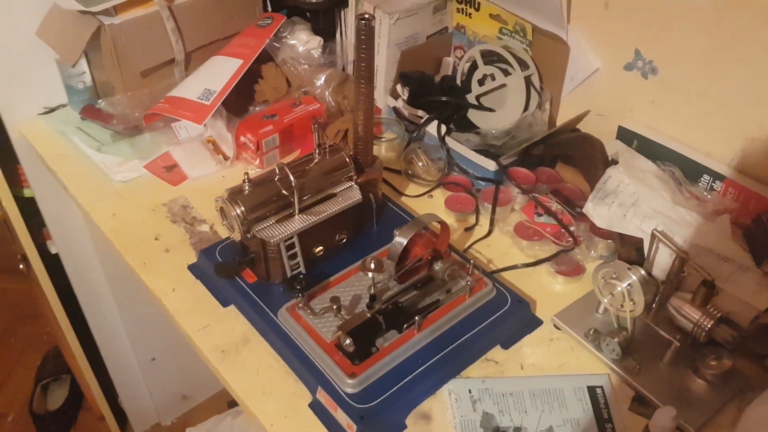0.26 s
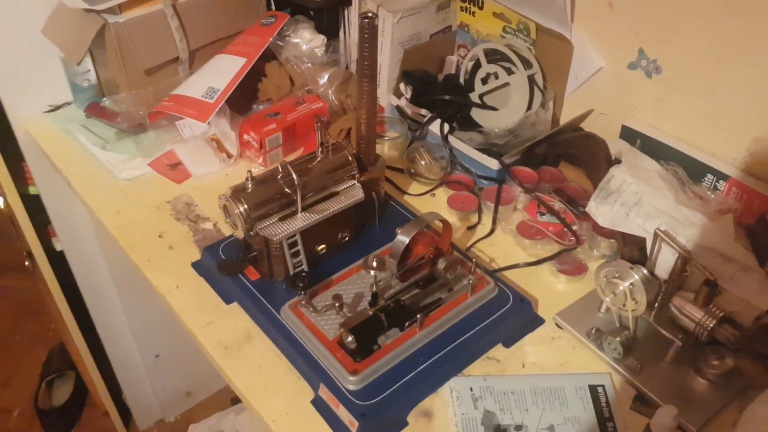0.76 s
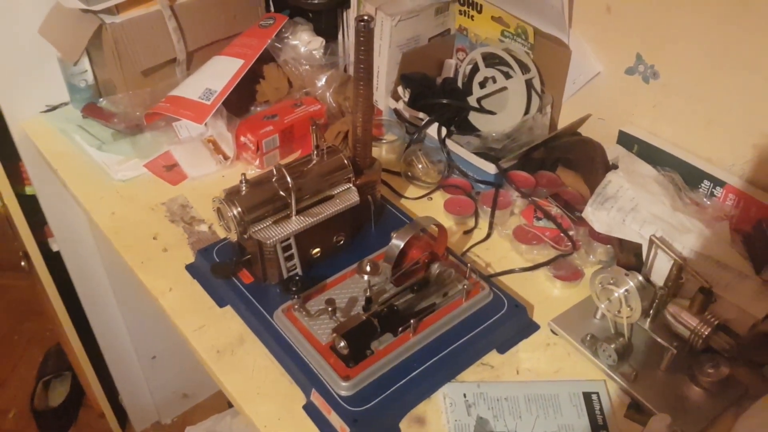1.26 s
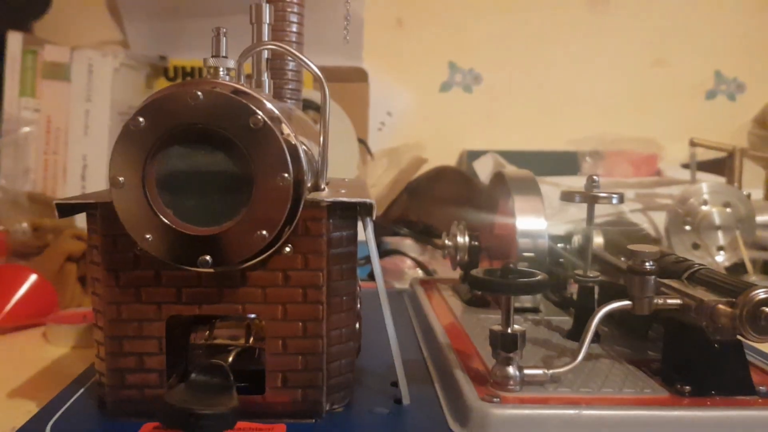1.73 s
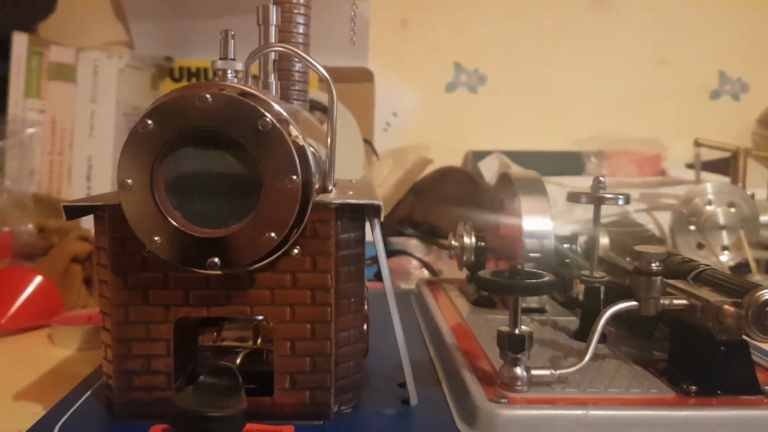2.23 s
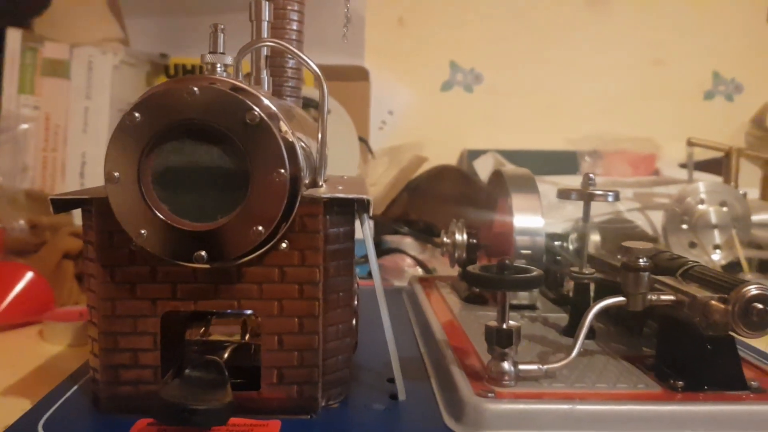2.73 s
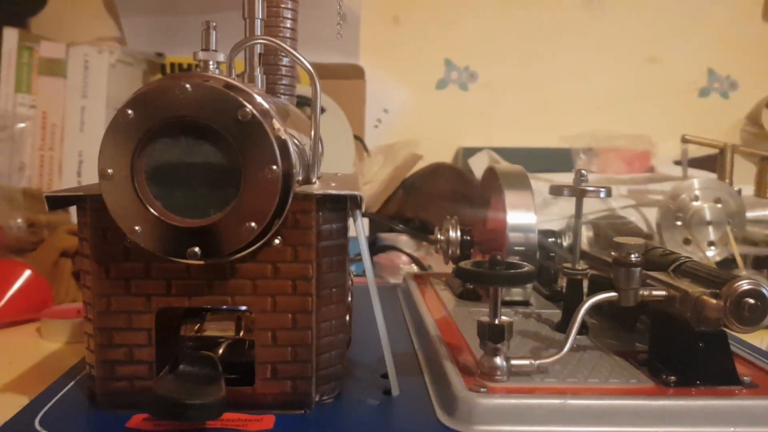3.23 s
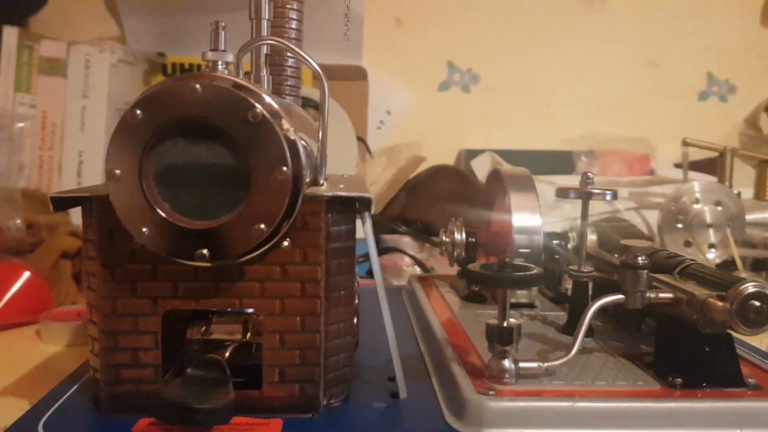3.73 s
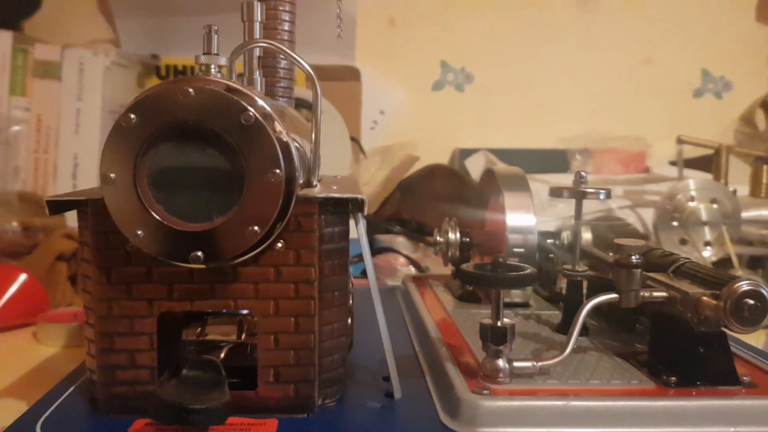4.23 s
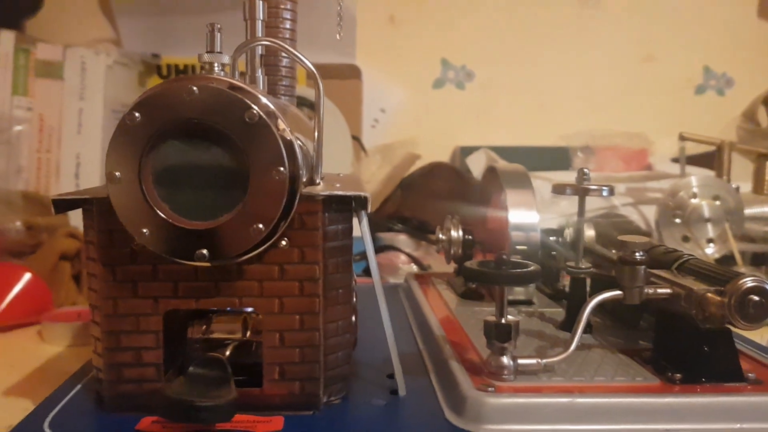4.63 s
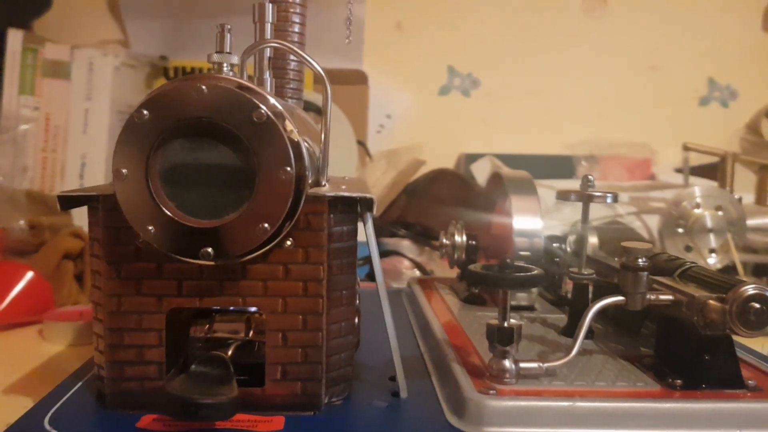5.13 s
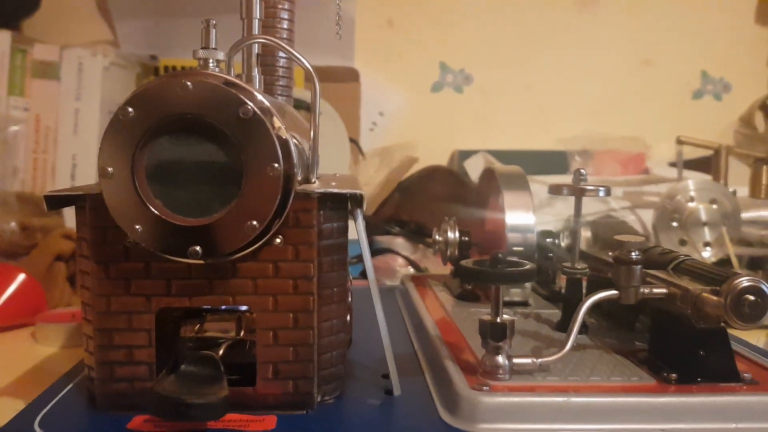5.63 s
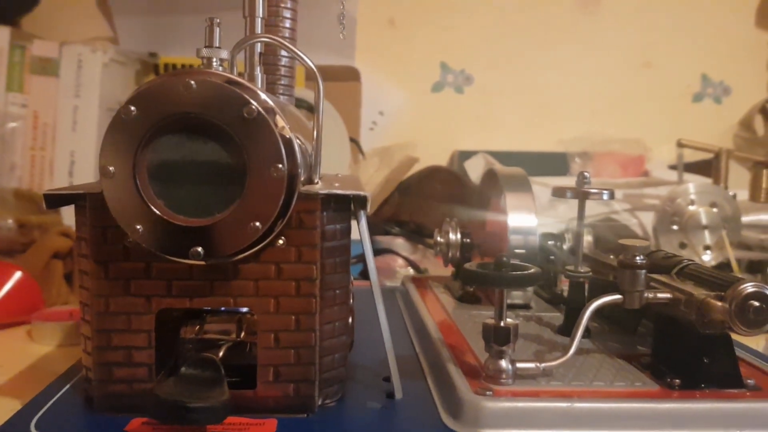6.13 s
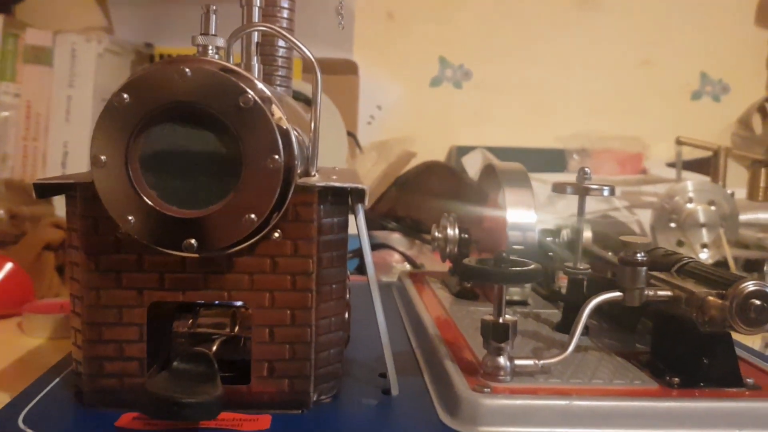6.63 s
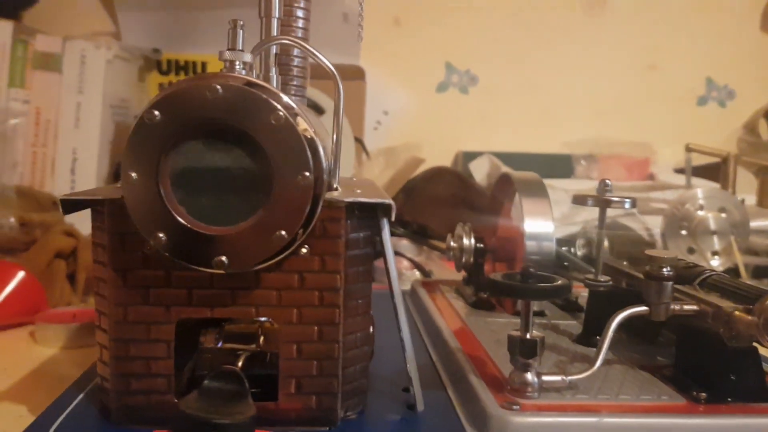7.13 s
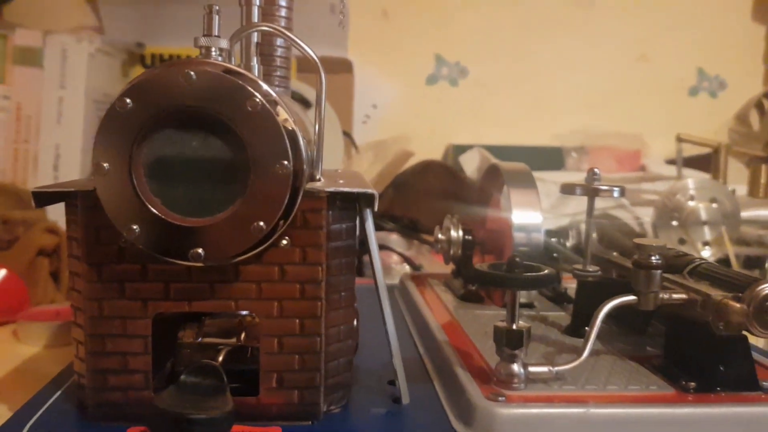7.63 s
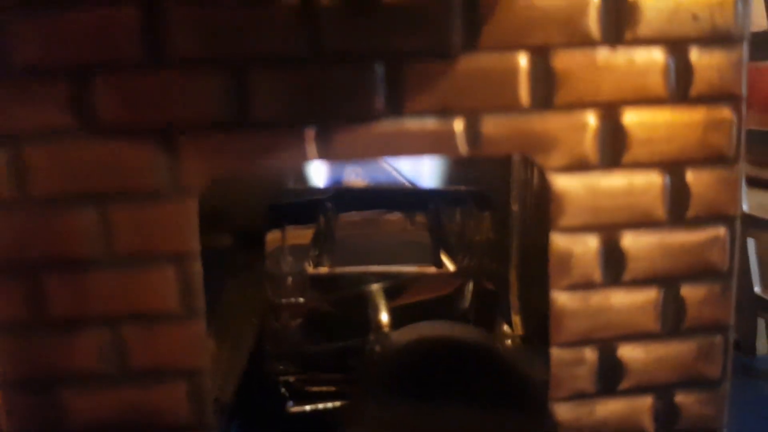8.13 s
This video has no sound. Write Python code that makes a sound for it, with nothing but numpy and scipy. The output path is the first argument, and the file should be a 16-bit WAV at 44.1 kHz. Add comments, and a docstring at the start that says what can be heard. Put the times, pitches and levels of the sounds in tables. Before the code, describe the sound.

A small model steam engine buzzes, clatters and hisses steadily indoors, duller at a second position with hand bumps, then suddenly close and loud.

```python
"""A model steam engine hums, clatters and hisses throughout, on a tin base shaken about 32 times a second indoors.
The hum sums multiples of the crank speed, loose joints strike the tin's resonances, and noise shaped by the
turning crank makes the steam hiss. Two close low tones beat about three times a second. Three listening places
follow in turn; in the second a hand shades the left microphone port; rubs and bumps run on into the third,
and the hardest bump makes the gain control turn everything down."""
import sys
import numpy as np
from scipy import signal
from scipy.fft import rfft, irfft, next_fast_len
from scipy.io import wavfile
from scipy.ndimage import uniform_filter1d, minimum_filter1d, map_coordinates

SR = 44100
rng = np.random.default_rng(int(sys.argv[2]) if len(sys.argv) > 2 else 0)


def wrap_up_sound(samples):
    """Save the sound to the file named by the first command line argument, as 16-bit audio."""
    columns = np.atleast_2d(samples).T
    # keep every value between -1 and 1, then stretch to whole-number steps
    tamed = np.clip(columns, -1, 1)
    steps = np.round(tamed * 32767).astype(np.int16)
    wavfile.write(sys.argv[1], SR, steps)


N = 368667

# Listening places. Each row: start in seconds, end in seconds, crank angle at the start in turns,
# lag of the left ear in milliseconds.
LISTENING_PLACES = [(0, 1.455, .775, -.36), (1.455, 7.818, .285, -.2), (7.818, 8.36, .7, .25)]


def amp(db):
    """Level law: decibels become an amplitude ratio."""
    return 10 ** (np.asarray(db) / 20)


def unit(x):
    """Normalisation: the signal is scaled to rms 1."""
    return x / np.sqrt(np.mean(x ** 2) + 1e-20)


def along(points, hz):
    """Logarithmic pitch: (Hz, value) points are interpolated on a log-frequency axis."""
    f, v = np.transpose(points)
    return np.interp(np.log(hz + 1), np.log(f + 1), v)


def curves(rows, t):
    """Linear interpolation: each column after the time is read at the times t."""
    s, *cols = np.transpose(rows)
    return [np.interp(t, s, c) for c in cols]


def wobble(t, rate):
    """Slow random modulation: a spline through random knots, rate knots a second."""
    at = (t - t[0]) * rate
    knots = rng.standard_normal(int(at[-1]) + 4)
    return map_coordinates(knots, [at + 1])


def coloured(x, gain):
    """Minimum-phase filtering: a folded cepstrum gives the causal filter of magnitude gain(Hz)."""
    n = x.shape[-1]
    m = 2 * next_fast_len(n // 2 + 4096)
    magnitude = np.maximum(gain(np.fft.rfftfreq(m, 1 / SR)), 1e-6)
    cepstrum = irfft(np.log(magnitude))
    cepstrum[1:m // 2] *= 2
    cepstrum[m // 2 + 1:] = 0
    response = np.exp(rfft(cepstrum))
    return irfft(rfft(x, m) * response, m)[..., :n]


def ears(pair, place):
    """Interaural coherence: two signals become partly alike ears, whose average has rms 1."""
    # Level difference at each place. Each row: frequency in Hz, left minus right in dB.
    ear_tilt = [
        [(60, 0), (110, 5.5), (200, 6), (380, 5.5), (700, 15.5), (1290, 18.5), (2380, 24), (4400, 17.5),
         (8120, 31), (15000, 22)],
        [(60, 8), (110, 3), (200, 12.5), (380, 10), (700, 12), (1290, 18), (2380, 15), (4400, 6.5), (8120, 4),
         (15000, 15)],
        [(60, 5), (110, 4.5), (200, 19), (380, 8), (700, 13.5), (1290, 19.5), (2380, 14), (4400, 7.5),
         (8120, 7.5), (15000, 7)],
    ]
    # Likeness of the ears. Each row: frequency in Hz, coherence from 0 to 1.
    likeness = [(100, .95), (300, .96), (600, .8), (2000, .74), (4000, .3), (12000, .2)]
    n = pair.shape[-1]
    m = next_fast_len(n + 512)
    hz = np.fft.rfftfreq(m, 1 / SR)
    left, other = rfft(pair, m)
    alike = np.clip(along(likeness, hz), 0, 1)
    lag_s = LISTENING_PLACES[place][3] / 1000
    advance = np.exp(2j * np.pi * hz * lag_s)
    mixed = alike * left + np.sqrt(1 - alike ** 2) * other
    right = mixed * amp(-along(ear_tilt[place], hz)) * advance
    both = irfft(np.array([left, right]), m)[:, :n]
    return both / np.sqrt(np.mean(both.mean(axis=0) ** 2))


def engine(t, place):
    """Common periodicity: one crank, its angle the integral of its speed, times every part."""
    # Crank speed at each place. Each row: time in seconds, speed in turns a second.
    crank_speed = [
        [(0, 31.05), (0.7, 31.31), (1.455, 31.56)],
        [(1.455, 32.16), (2.3, 32.37), (3.2, 32.46), (4.2, 32.48), (5, 32.53), (5.8, 32.5), (6.6, 32.71),
         (7.818, 32.6)],
        [(7.818, 32.14), (8.36, 32.2)],
    ]
    # Spectrum of the steam's puff. Each row: frequency in Hz, relative level in dB.
    puff_colour = [(1500, -16), (3400, 0), (4200, -1.5), (4850, -0.5), (5500, -5.5), (6300, -7.5),
                   (7200, -25), (9000, -46), (16000, -77)]
    # Spectrum of the finer sizzle at each place. Each row: frequency in Hz, relative level in dB.
    sizzle_colour = [
        [(3000, -20), (6000, -12), (7000, -10.5), (8500, -14.5), (10200, -6), (12200, 1.5), (14200, -1.5),
         (16000, -8.5)],
        [(6000, -50), (8400, -25), (10000, -9), (11500, -2), (13500, 1), (15200, 3), (16000, -8)],
        [(6000, -32), (8400, -18.5), (10200, -8), (13200, -3.5), (15200, 1), (16000, -6)],
    ]
    start, _, angle, _ = LISTENING_PLACES[place]
    turned = np.cumsum(curves(crank_speed[place], t)[0]) / SR
    crank = angle + turned - np.interp(start, t, turned)
    hum_gain, clatter_gain, puff_gain, sizzle_gain = levels(t, place)
    base = hum(t, crank, place, kick_angle=.55, spread=0.67, stray_db=-6.0, swing_db=4)
    knocks = clatter(t, crank, place, t60=0.045, scatter_db=2, jitter_s=.00004,
                     loose_db=1.0, broad_db=-5.5, ring_db=-0.5)
    puff = steam(t, crank, place, puff_colour, depth=0.76, flutter_db=1.0, spit_db=-0.5)
    sizzle = steam(t, crank, place, sizzle_colour[place], depth=0.9, flutter_db=1.5, spit_db=1.5)
    return (throb(t, crank, place, partner_db=1.0, depth_db=3, shudder_db=-6)
            + hum_gain * base + clatter_gain * knocks + puff_gain * puff + sizzle_gain * sizzle)


def hum(t, crank, place, kick_angle, spread, stray_db, swing_db):
    """Harmonic series: a kick once a turn drives whole multiples of the speed, partly in step."""
    # Hum of the base at each place. Each row: multiple of the crank speed, relative level in dB.
    harmonics = [
        [(2, -17.5), (3, -6.5), (5, -10.5), (6, -10.5), (7, 1), (8, -32), (9, -6), (10, -5), (11, -9),
         (12, -23.5), (15, -1.5), (16, -33), (26, -10), (34, -11.5)],
        [(2, -12), (3, -5.5), (5, -28), (6, -5), (7, -8.5), (8, -6.5), (9, 2), (10, -8), (11, -12.5),
         (12, -15.5), (13, -19), (14, -7), (15, 0), (16, -5.5), (17, -12), (18, -16), (33, -11.5), (34, -18.5),
         (39, -20.5)],
        [(2, -18), (3, -5), (6, -28), (7, -23), (8, -16), (9, -1), (10, -14.5), (11, -9), (12, -8), (14, -1.5),
         (15, .5), (16, -3.5), (17, -23.5), (18, -15), (21, -13)],
    ]
    # Irregular shaking of base and table. Each row: frequency in Hz, relative level in dB.
    shake_colour = [(20, -53), (40, -1), (65, -15), (105, 3), (138, 9), (170, -4.5), (215, 6), (290, 6),
                    (390, -10), (490, 8), (580, -3.5), (900, -51.5)]
    lines = np.zeros(len(t))
    for k, db in harmonics[place]:
        cycles = round(k) * (crank - kick_angle) + spread * rng.random()
        lines += amp(db + .9 * wobble(t, 14)) * np.sin(2 * np.pi * cycles)
    # the loose shaking is strongest a quarter turn before the kick angle
    kick = amp(swing_db * np.sin(2 * np.pi * (kick_angle - crank)))
    noise = kick * rng.standard_normal((2, len(t)))
    shake = coloured(noise, lambda hz: amp(along(shake_colour, hz)))
    return ears(np.array([lines, 0 * t]), place) + amp(stray_db) * ears(shake, place)


def clatter(t, crank, place, t60, scatter_db, jitter_s, loose_db, broad_db, ring_db):
    """Impact excitation: each joint strikes once a turn, a little unevenly, and rings the tin's modes."""
    # Knocks within a turn. Each row: crank angle in turns, mean relative level in dB.
    joints = [(.04, -6), (.125, -2.5), (.22, -4.5), (.305, -1.5), (.385, -3), (.46, -7.5), (.535, -4),
              (.655, -4), (.8, -5.5)]
    # Tin resonances at each place. Each row: centre in Hz, nominal width in Hz, relative level in dB.
    tin_modes = [
        [(796, 37, -9), (1165, 25, -6), (1580, 31, -17), (2230, 51, 2), (2730, 114, -2.5), (3078, 55, -5.5),
         (4660, 70, -15)],
        [(751, 115, -3.5), (1099, 60, -1), (1609, 19.7, -3), (1936, 42, 1.5), (2224, 120, -7), (2700, 69, -6.5),
         (3096, 39, -16.5), (3335, 18, -15)],
        [(668, 52, -9), (1150, 300, -5), (1390, 54, -2.5), (2260, 96, -1), (2720, 73, -5), (3630, 42, -20),
         (4310, 73, -17)],
    ]
    # Broad spectrum of the knocks at each place. Each row: frequency in Hz, relative level in dB.
    knock_colour = [
        [(330, -52), (560, -27), (632, 5), (790, 2), (973, -1.5), (1300, -1), (1830, 2.5), (2030, -9.5),
         (2260, 0), (2450, -11), (2760, -16), (3800, -16.5), (6000, -29.5), (9000, -68)],
        [(330, -13), (560, -5.5), (729, 1.5), (891, -6), (1150, -3), (1400, -3), (1500, -11), (1990, -4),
         (2740, -10), (3800, -24), (6000, -41.5), (9000, -86)],
        [(330, -56), (560, 1), (679, 5.5), (849, -3), (1050, 4.5), (1360, -2.5), (1880, 0), (2030, -5),
         (2260, 1.5), (3800, -17.5), (6000, -42), (9000, -67)],
    ]
    age = np.arange(SR // 12) / SR
    decay = amp(-60 * age / t60)
    turns = np.arange(-1, np.ceil(crank[-1]))
    rings, energy = np.zeros((2, len(t))), np.zeros(len(t))
    for angle, db in joints:
        chance = rng.standard_normal((len(turns), 2))
        when = np.interp(turns + angle, crank, t - t[0]) + jitter_s * chance[:, 0]
        inside = (when > 0) & (when < t[-1] - t[0] - .001)
        strengths = amp(db + scatter_db * chance[inside, 1])
        blows = np.bincount((when[inside] * SR).astype(int), strengths, len(t))
        ring = decay * rng.standard_normal((2, len(age)))  # each joint has its own
        rings += signal.fftconvolve(blows[None], ring, axes=1)[:, :len(t)]
        energy += signal.fftconvolve(blows ** 2, decay ** 2)[:len(t)]
    # loose rattle: fresh noise that follows the energy of the knocks
    rattle = amp(loose_db) * np.sqrt(np.abs(energy)) * rng.standard_normal((2, len(t)))

    def body(hz):
        """Modal response: resonance peaks add in power to the broad spectrum."""
        modes = sum(amp(db + ring_db) / (1 + ((hz - centre) / (0.73 * width)) ** 2)
                    for centre, width, db in tin_modes[place])
        return np.hypot(modes, amp(broad_db + along(knock_colour[place], hz)))

    return ears(coloured(rings + rattle, body), place)


def steam(t, crank, place, colour, depth, flutter_db, spit_db):
    """Turbulent jet noise: hiss is modulated by the valve's flow, with random flutter and spitting."""
    # Steam flow within a turn. Each row: crank angle in turns, level in dB before the depth factor.
    exhaust_flow = [(0, -6), (.035, 3), (.11, 2.5), (.22, -1), (.31, 2.5), (.4, -1), (.5, 1), (.64, -2),
                    (.78, -6), (.93, -7.5)]
    angle, db = np.transpose(exhaust_flow)
    valve_db = depth * np.interp(crank, angle, db, period=1)
    flow_db = valve_db + flutter_db * wobble(t, 110) + spit_db * wobble(t, 900)
    jet = amp(flow_db) * rng.standard_normal((2, len(t)))
    return ears(coloured(jet, lambda hz: amp(along(colour, hz))), place)


def throb(t, crank, place, partner_db, depth_db, shudder_db, order=4):
    """Beating: the fourth multiple meets a tone just below it; a low shudder swells with every beat."""
    # Beats at each place. Each row: time of one swell in seconds, rate in beats a second.
    beat_times = [(0.02, 3.1), (1.605, 2.765), (7.95, 2.9)]
    # Spectrum of the shudder. Each row: frequency in Hz, relative level in dB.
    shudder_colour = [(25, -39), (60, -11), (100, -2.5), (135, 4), (175, -2), (300, -40), (700, -120)]
    # Throb at each place: one level in dB.
    place_db = [-37, -35.3, -32]
    swell_s, beat_rate = beat_times[place]
    beat = 2 * np.pi * beat_rate * (t - swell_s)
    phase = 2 * np.pi * order * crank + .3 * wobble(t, 10)
    tone = unit(np.sin(phase) + amp(partner_db) * np.sin(phase - beat))
    noise = rng.standard_normal(len(t))
    shudder = unit(coloured(noise, lambda hz: amp(along(shudder_colour, hz))))
    boom = amp(depth_db * np.cos(beat)) * (tone + amp(shudder_db) * shudder)
    return amp(place_db[place]) * ears(np.array([boom, 0 * t]), place)


def levels(t, place):
    """Acoustic shading: at the second place the hand dims the layers, mostly at the left, after a brief flare."""
    # Each row is a place: hum, clatter, puff and sizzle levels in dB.
    layer_db = [(-30.5, -34, -52.5, -45), (-30, -35, -60, -58), (-27.5, -26, -47, -44)]
    # Shading, a row each for hum, clatter, puff and sizzle.
    # Each row: start in seconds, duration in seconds, left loss in dB, right loss in dB.
    shading = [(4.95, 1.08, 4.5, -0.5), (4.94, 1.2, 7, 0), (5, .8, 7.5, -0.5), (4.84, .25, 13, 1.5)]
    # Flare of the same four layers. Each row: rise in seconds, fall in seconds, peak gain in dB.
    flare = [(0.09, 0.13, 1.5), (0.067, .13, 4.5), (.09, .14, 11.5), (0.31, .05, 11.5)]
    # Slow swell of the sizzle: peak time in seconds, half width at 1/e of the dB gain in seconds, gain in dB.
    slow_swell = (3.1, 0.9, 3.5)
    flare_s = 4.81  # the hand shifts its grip
    db = np.array(layer_db[place])[:, None, None] + np.zeros((2, len(t)))
    if place == 1:
        peak_s, width_s, swell_db = slow_swell
        db[-1] += swell_db * np.exp(-((t - peak_s) / width_s) ** 2)
        for layer, (rise, fall, gain_db) in enumerate(flare):
            db[layer] += np.interp(t - flare_s, [-rise, 0, fall], [0, gain_db, 0])
        for layer, (start, over, *loss_db) in enumerate(shading):
            db[layer] -= np.outer(loss_db, np.clip((t - start) / over, 0, 1))
    return amp(db)


def handling():
    """Contact noise: rubbing sounds as low rumble, and each bump as a short thud that sinks in pitch."""
    # Spectrum of the rubbing. Each row: frequency in Hz, relative level in dB.
    rub_colour = [(15, -28), (30, -13), (50, -0.5), (80, 3), (115, -11), (170, -17), (300, -29), (800, -72)]
    # Rubs of the hand. Each row: start in seconds, end in seconds, mean level in dB.
    rub_times = [(4.81, 4.83, -36), (5.15, 5.6, -39), (5.68, 7.03, -28), (7.1, 7.76, -22.5),
                 (7.82, 7.92, -26.5)]
    # Bumps at the left port. Each row: start in seconds, envelope peak in dB before gain control.
    bump_times = [(6.528, -20), (6.648, -15), (7.0328, 4.5), (7.09, -10), (7.922, -26)]
    rub_rise_s, rub_fall_s = .025, 0.061
    t = np.arange(N) / SR
    rumble = unit(coloured(rng.standard_normal(N), lambda hz: amp(along(rub_colour, hz))))
    rubbing = np.zeros(N)
    for start, end, db in rub_times:
        rise = np.maximum(start - t, 0) / rub_rise_s
        fall = np.maximum(t - end, 0) / rub_fall_s
        rubbing = np.maximum(rubbing, amp(db) * np.exp(-rise - fall))
    out = rumble * rubbing * amp(2 * wobble(t, 18))
    rise_s, sink_s, rest_hz, extra_hz = .006, .008, 65, 100
    for s, db in bump_times:
        age = np.maximum(t - s, 0)
        cycles = rest_hz * age + extra_hz * sink_s * (1 - np.exp(-age / sink_s))
        envelope = age / rise_s * np.exp(1 - age / rise_s)
        out += amp(db) * envelope * np.sin(2 * np.pi * cycles)
    return out * amp([[0], [-32]])  # far weaker at the right


def click(s, db, decay_s):
    """Impulse: one exponentially decaying click sounds as the last place is taken up."""
    age = np.arange(N) / SR - s
    pulse = (age >= 0) * np.exp(-np.abs(age) / decay_s)
    return amp(db) * pulse * amp([[0], [-9]])


def scene():
    """Superposition: the engine, from each place in turn, adds to the handling noise and the click."""
    # The click: start in seconds, left peak in dB before gain control, decay time constant in seconds.
    sharp_click = (7.818, -10, .00015)
    out = handling() + click(*sharp_click)
    t = np.arange(N) / SR
    lead_s, join_s = .03, .004
    for place, (start, end, _, _) in enumerate(LISTENING_PLACES):
        near = (t > start - lead_s) & (t < end + lead_s)
        edge_s = np.minimum(t[near] - start, end - t[near])
        fade = np.clip(edge_s / join_s + .5, 0, 1)
        out[:, near] += fade * engine(t[near], place)
    return out


def gain_control(x, size=128):
    """Peak limiting: a peak over the ceiling turns the gain down at once; it creeps back slowly."""
    ceiling_db, recovery_db_per_s = -0.5, .3
    creep_db = recovery_db_per_s * np.arange(x.shape[1]) / SR
    peak_db = 20 * np.log10(np.abs(x).max(axis=0) + 1e-9)
    needed_db = np.minimum(ceiling_db - peak_db, 0)
    held_db = np.minimum.accumulate(minimum_filter1d(needed_db, size) - creep_db) + creep_db
    return x * amp(uniform_filter1d(held_db, size))


def record(dry):
    """Limiting and band limiting: gain control starts afresh at each place, then the top is cut off."""
    top_hz = 16000
    starts = [round(start * SR) for start, *_ in LISTENING_PLACES[1:]]
    parts = np.split(dry, starts, axis=1)
    held = np.concatenate([gain_control(part) for part in parts], axis=1)
    m = next_fast_len(N + 4096)
    passed = np.fft.rfftfreq(m, 1 / SR) < top_hz
    return irfft(rfft(held, m) * passed, m)[:, :N]


dry = scene()
out = record(dry)
wrap_up_sound(out)
```